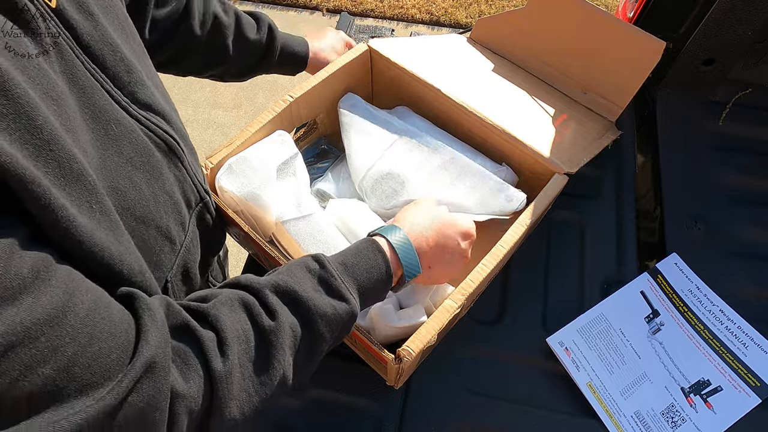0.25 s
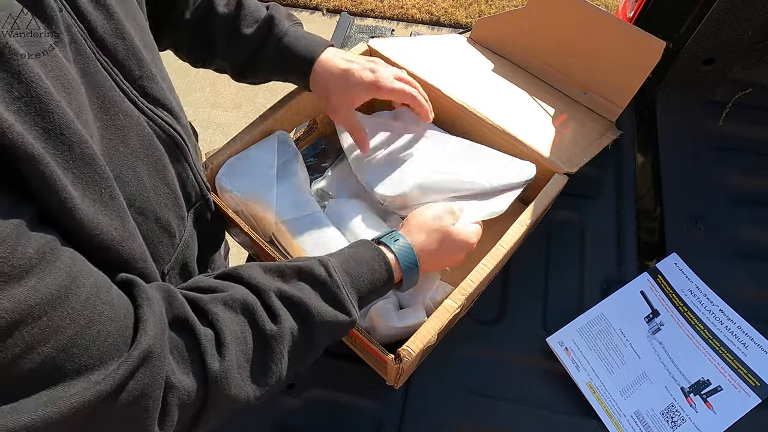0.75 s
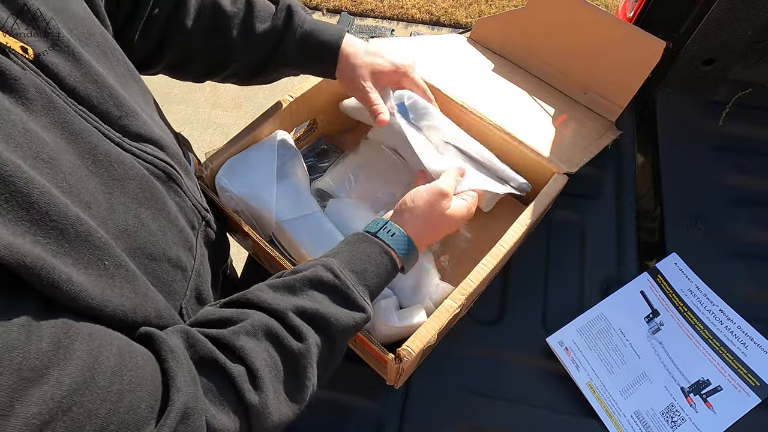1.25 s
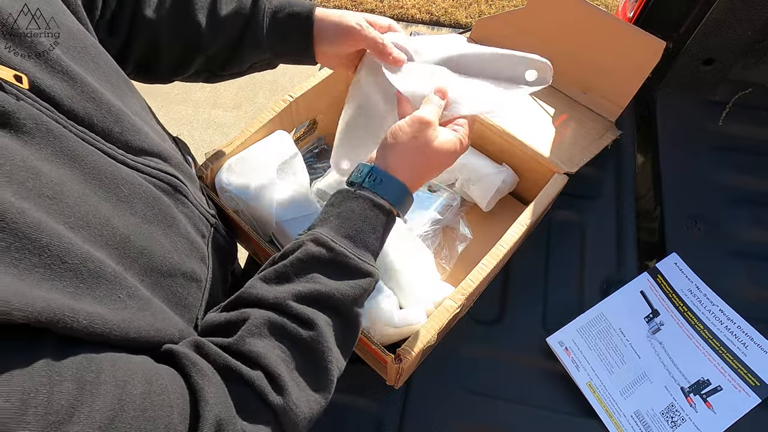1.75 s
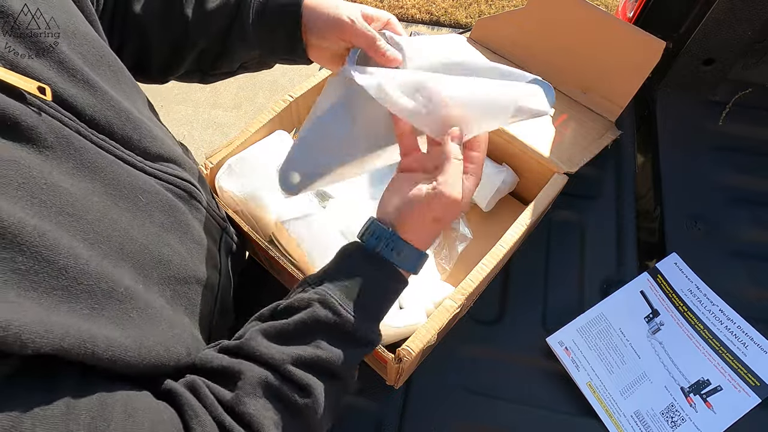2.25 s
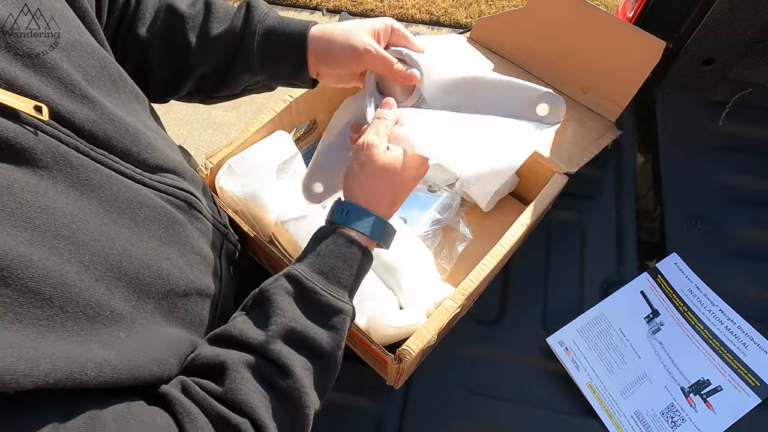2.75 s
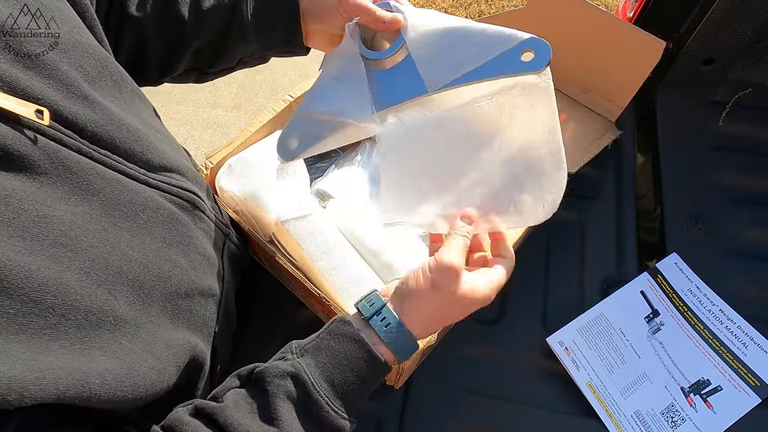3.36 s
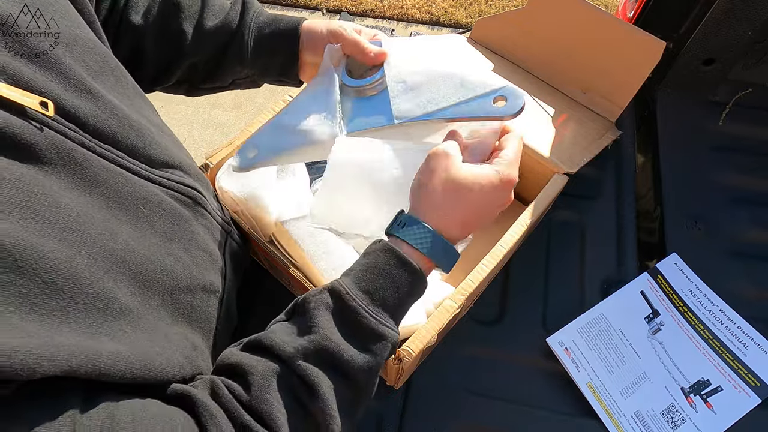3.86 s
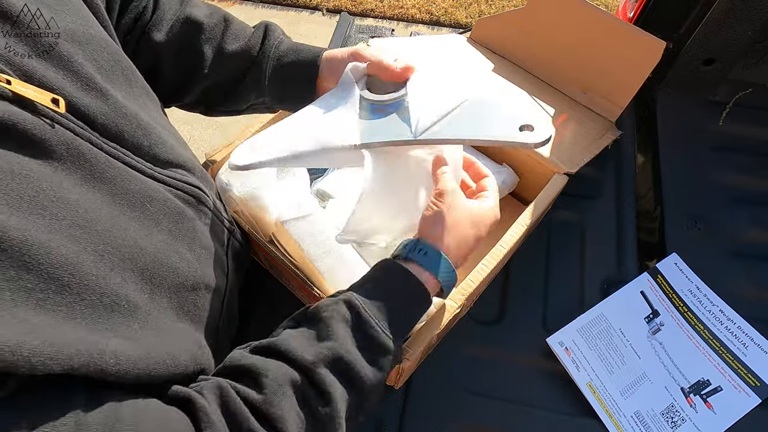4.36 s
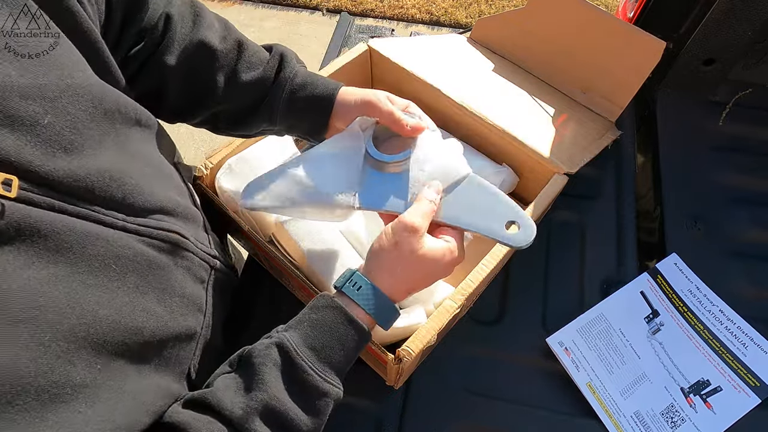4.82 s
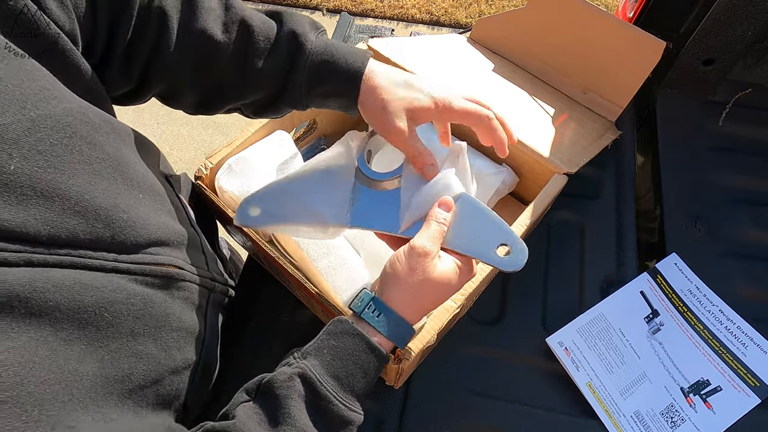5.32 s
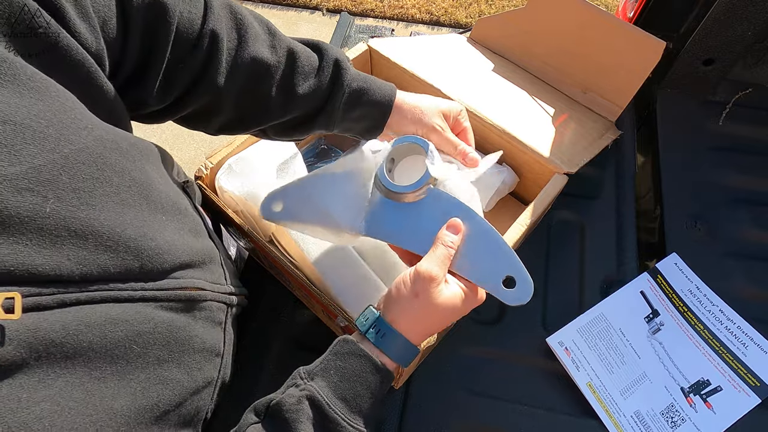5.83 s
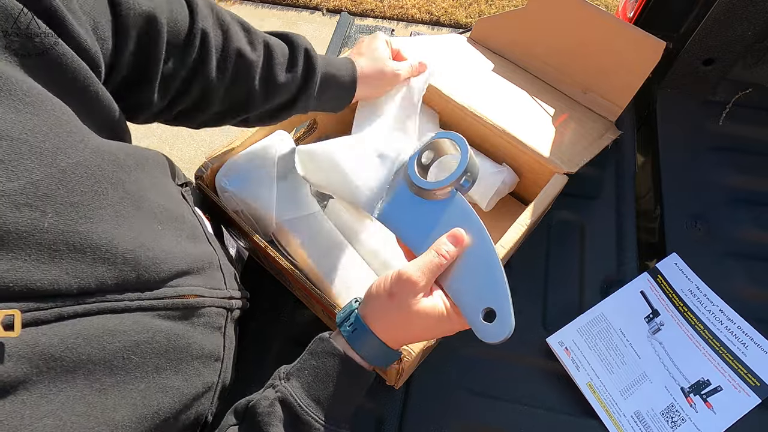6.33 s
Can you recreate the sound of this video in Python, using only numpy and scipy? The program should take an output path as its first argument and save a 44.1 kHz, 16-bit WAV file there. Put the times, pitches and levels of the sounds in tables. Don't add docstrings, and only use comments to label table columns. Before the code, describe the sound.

Outdoors, very close, hands work foam packing wrap off a metal bracket. Sharp dry snaps, small pops and dense rustle come in uneven bursts, with hollow cardboard thuds early on. A short ripping strip of tape sounds near the middle, then the busiest crackling follows around four seconds. Gritty skids and a last hard flurry end it. A light breeze rumbles faintly; the close sound has a slight hollow doubling.

```python
import sys
import numpy as np
from scipy import signal
from scipy.fft import rfft, irfft, next_fast_len
from scipy.io import wavfile
from scipy.ndimage import uniform_filter1d, minimum_filter1d, map_coordinates

SR = 44100
rng = np.random.default_rng(int(sys.argv[2]) if len(sys.argv) > 2 else 0)


def wrap_up_sound(samples):
    columns = np.atleast_2d(samples).T
    tamed = np.clip(columns, -1, 1)
    steps = np.round(tamed * 32767).astype(np.int16)
    wavfile.write(sys.argv[1], SR, steps)


def undo_db(level):
    steps = np.asarray(level, float) / 20
    return 10 ** steps


N = 290442


def unit(x):
    return x / np.sqrt(np.mean(x ** 2) + 1e-20)


def along(points, hz):
    f, v = np.transpose(points)
    return np.interp(np.log(hz + 1), np.log(f + 1), v)


def curves(rows):
    s, *cols = np.transpose(rows)
    return [np.interp(np.arange(N) / SR, s, c) for c in cols]


def wobble(rate):
    knots = rng.standard_normal(int(N * 400 / SR))
    return map_coordinates(knots, [np.arange(N) * rate / SR])


def filtered(x, response):
    m = next_fast_len(N + 8192)
    return irfft(rfft(x, m) * response(np.fft.rfftfreq(m, 1 / SR)), m)[..., :N]


def noise(spectrum):
    return unit(filtered(rng.standard_normal(N), lambda hz: undo_db(along(spectrum, hz))))


def samples(s):
    return (s * SR).astype(int)


def placed(start, shapes):
    at = start[:, None] + np.arange(shapes.shape[1])
    return np.bincount(at.ravel(), shapes.ravel(), N + SR)[:N]


def swells(rows, rest_db):
    slack_db, rounding = 15.5, 1.186
    t = np.arange(N) / SR
    power = undo_db(2 * rest_db) + 0 * t
    for grip, hardest, free, db in rows:
        before = (hardest - t) / max(hardest - grip, .01)
        after = (t - hardest) / max(free - hardest, .01)
        away = np.maximum(before, after)
        power = power + undo_db(2 * (db - slack_db * away ** rounding))
    return 10 * np.log10(power)


def creases(hz, cycles, sag, tick, size):
    turns = hz[:, None] * np.arange(size) / SR
    ring = np.sin(2 * np.pi * (turns + 2 * sag * (1 - np.exp(-turns))))
    ring = ring * np.exp(-turns / cycles) * (1 - np.exp(-turns / 0.1))
    ring[:, 4:16] += tick[:, None] * rng.standard_normal((len(hz), 12))
    return ring


def slips(start, length, gap, db, hz, scatter, spread_db):
    fade_db = 3
    luck = rng.standard_normal((40, 3))
    count = np.arange(len(luck))
    s = start + gap * (count + scatter * luck[:, 0] * (count > 0))
    db = db - fade_db * (s - start) / length + spread_db * luck[:, 1]
    return np.transpose([s, db, hz * np.exp(.065 * luck[:, 2])])[s < start + length]


# start_s, peak_db, ring_hz
TIGHT_TICKS = [(0.8704, -23, 2656), (1.6759, -11, 2700), (0.8844, -17.5, 3320), (2.0218, -9, 2840),
               (3.1797, -14, 2530), (3.4826, -24.5, 2835), (3.5322, -25, 2760), (4.4372, -18, 3500),
               (1.7204, -9, 2200), (4.4454, -14, 3560), (4.7318, -19, 2650), (4.784, -15.5, 2460),
               (4.7991, -13, 2980), (4.9718, -13.5, 3100), (5.0133, -30, 3436), (5.0416, -31, 3630),
               (5.2369, -23, 2720), (5.3783, -13.5, 3160), (6.4494, -13, 3320), (1.161, -19, 2950),
               (1.187, -21, 3130), (1.2418, -21, 2840), (2.9354, -10, 2100), (3.6476, -30.5, 4470),
               (4.0401, -12, 3040), (5.6253, -18.5, 2970), (4.33, -23, 3000), (4.197, -8.5, 2600),
               (3.9875, -12, 3300), (2.5968, -13, 1650), (4.024, -15.5, 2720)]
# start_s, peak_db, ring_hz
FOLD_FLIPS = [(1.115, -11, 2360), (1.8904, -14, 2310), (1.917, -12, 2270), (2.097, -8.5, 1550),
              (2.1609, -11.5, 1500), (3.0526, -15, 2420), (3.3475, -10, 2550), (3.3802, -13.5, 2230),
              (3.538, -15.5, 2320), (3.884, -19, 1480), (3.9084, -13.5, 2170), (4.291, -14, 2120),
              (4.3091, -15.5, 1970), (4.4872, -15.5, 2000), (5.0806, -24, 2131), (5.104, -15.5, 2220),
              (5.657, -14, 2350), (5.8413, -12.5, 1640), (5.9288, -9, 2900), (6.1223, -8.5, 2110),
              (6.1462, -17.5, 2180), (2.073, -12, 1540), (2.124, -20, 1660), (3.288, -31, 2930),
              (5.221, -27, 2220), (4.013, -24, 2200), (6.297, -29, 2010)]
# start_s, peak_db, ring_hz
SETTLING_SNAPS = [(0.0885, -17, 1830), (0.4807, -19, 2650), (0.8434, -13, 3090), (1.143, -18, 1580),
                  (1.826, -14.5, 2630), (1.8723, -19, 1430), (1.897, -11, 2480), (2.0511, -16.5, 1780),
                  (2.143, -12, 1400), (2.215, -20.5, 2025), (2.4161, -26, 2870), (3.1452, -19, 2130),
                  (3.4132, -15.5, 2300), (3.5549, -14, 2900), (4.247, -12, 2620), (4.5424, -20, 2760),
                  (4.7204, -17, 2030), (4.7577, -13.5, 2666), (4.8513, -14.5, 2440), (5.0257, -21, 3740),
                  (5.123, -12.5, 2683), (5.2527, -27, 1970), (5.7987, -12, 2810), (5.909, -19, 2524),
                  (6.257, -17, 2141), (6.3405, -7, 2062), (6.5783, -21, 2330), (5.5651, -24, 2200),
                  (0.826, -29, 2800), (2.77, -29, 2800), (6.283, -25, 1880), (3.7335, -45, 3620),
                  (3.699, -40, 3530)]
# start_s, peak_db, ring_hz
MORE_SETTLING_SNAPS = [(0.3047, -23, 1920), (0.326, -27, 3830), (0.408, -19, 2450), (0.4544, -23, 1640),
                       (0.7971, -29, 1360), (0.922, -31, 2650), (0.9597, -22, 2590), (1.0042, -13, 2646),
                       (1.0914, -21, 2890), (1.275, -35, 1840), (1.3483, -29, 3460), (1.5055, -25, 1060),
                       (1.5514, -26, 1860), (1.8058, -24, 2940), (1.995, -24, 3820), (2.309, -29.5, 3400),
                       (2.376, -27, 2420), (2.5094, -31, 1610), (2.5274, -38, 1624), (2.5563, -31, 2400),
                       (2.6903, -28, 4160), (3.1038, -20, 2610), (3.13, -17, 2900), (3.766, -30, 2350),
                       (3.8958, -18, 1862), (4.0944, -13, 2700), (4.3653, -23, 3600), (4.3951, -32, 2120),
                       (4.4784, -18.5, 1120), (4.5568, -31, 3160), (4.6367, -39, 3220), (4.6593, -30, 2390),
                       (4.6829, -27, 3900), (4.8208, -29, 1640), (5.1536, -34, 2630), (5.1856, -32.5, 1340),
                       (5.6, -24.5, 2360), (5.6455, -22, 2630), (5.7815, -13, 3680), (6.0794, -41, 1860),
                       (6.4918, -19, 2080)]
# start_s, peak_db, ring_hz
CRUSHED_WADS = [(0.028, -31, 1640), (0.2165, -26, 4030), (0.3556, -17.5, 2070), (0.3907, -24, 1720),
                (0.7832, -27, 1460), (0.98, -24, 2584), (1.059, -24, 2180), (1.4495, -18, 1800),
                (1.4633, -20.5, 4010), (1.7745, -24, 1770), (1.82, -16.5, 3144), (2.3434, -20, 1740),
                (2.4089, -24, 2555), (2.5975, -21, 1608), (3.0387, -15.5, 1873), (3.4524, -18, 2190),
                (3.7747, -29, 2251), (3.8228, -22, 1620), (3.8365, -16, 2118), (4.431, -27, 2500),
                (4.568, -20.5, 2343), (4.7048, -21, 2910), (5.4513, -18, 2500), (5.6855, -13, 2440),
                (6.1151, -9.5, 1826), (6.3214, -14.5, 2725), (6.401, -15, 2212), (6.5165, -21.5, 2710)]
# start_s, length_s, gap_s, peak_db, ring_hz
STICK_SLIP_RUNS = [(0.996, 0.033, 0.0079, -12.5, 2590), (3.945, 0.043, 0.013, -11, 2600),
                   (4.1031, 0.026, 0.0082, -15, 2700), (5.9587, 0.045, 0.0097, -13, 1800)]
# start_s, peak_db, ring_hz
SINGLE_SLIPS = [(.2172, -15, 2700), (.2317, -14, 3900), (.2661, -25, 4200), (1.4234, -22, 1500),
                (1.4309, -17, 3000), (1.4643, -11, 4200), (4.0546, -11, 3400), (4.0677, -15, 2200),
                (4.0768, -15, 2300), (4.0873, -18, 2500), (4.2049, -12, 1700), (4.2097, -13, 1700),
                (4.2174, -12, 2900), (4.2268, -11, 2900), (4.279, -13, 2700), (5.706, -12, 3100),
                (5.7159, -15, 3600), (5.7338, -10, 3500), (5.7445, -15, 2900), (5.7475, -14, 3500),
                (5.7545, -11, 3400), (5.7645, -12, 3400), (5.7784, -17, 2800), (5.9466, -14, 1900)]


def snaps():
    runs = np.concatenate([slips(*run, scatter=.03, spread_db=1.5) for run in STICK_SLIP_RUNS])
    clean_db, settle_db, spray_db, run_db = -22, -8.5, 0.5, -17
    kinds = [(TIGHT_TICKS, clean_db), (FOLD_FLIPS, clean_db), (SETTLING_SNAPS, settle_db),
             (MORE_SETTLING_SNAPS, settle_db), (CRUSHED_WADS, spray_db), (runs, run_db), (SINGLE_SLIPS, run_db)]
    s, db, hz = np.concatenate([rows for rows, _ in kinds]).T
    after_db = np.concatenate([np.full(len(rows), after) for rows, after in kinds])
    luck = rng.standard_normal((len(s), 2))
    life = 1.6 * np.exp(.25 * luck[:, :1])
    click = creases(hz, life, sag=.12, tick=.21 * undo_db(2.5 * luck[:, 1]), size=300)
    click += .3 * creases(.62 * hz, 1.8, sag=.3, tick=0 * hz, size=300)
    t = np.arange(1500) / SR
    grit = rng.standard_normal((len(s), 2, len(t)))
    carrier = np.sin(2 * np.pi * hz[:, None] * t)
    tuned = 4.4 * uniform_filter1d(grit[:, 0], size=14, axis=1) * carrier
    bright = grit[:, 1] - uniform_filter1d(grit[:, 1], size=18, axis=1)
    fade = undo_db(after_db[:, None] - 60 * t / 0.034) * (1 - np.exp(-t / 0.0006))
    spray = (tuned + 0.5 * bright) * fade
    start = samples(s)
    return placed(start, undo_db(db + 1.5)[:, None] * click) + placed(start, undo_db(db - 3.0)[:, None] * spray)


# start_s, peak_db
TAPE_SLIPS = [(2.791, -10.5), (2.8018, -11), (2.8076, -11.5), (2.8121, -12.5), (2.8208, -14), (2.8267, -12),
              (2.8331, -14), (2.8409, -13), (2.8523, -12), (2.859, -14), (2.8677, -12), (2.8731, -14),
              (2.8835, -15), (2.8906, -14), (2.8979, -13), (2.9051, -12), (2.914, -14), (2.9465, -14)]


def tear():
    s, db = np.transpose(TAPE_SLIPS)
    hz = (1730 + 700 * np.exp(-(s - s[0]) / .03)) * np.exp(.05 * rng.standard_normal(len(s)))
    pluck = 1.2 * creases(hz, 2.6, sag=.12, tick=np.full(len(s), .4), size=300)
    slip = np.pad(pluck, [(0, 0), (0, 400)])
    t = np.arange(slip.shape[1]) / SR
    grit = rng.standard_normal((2, *slip.shape))
    strip = unit(uniform_filter1d(grit[0], size=56, axis=1)) * np.sin(2 * np.pi * hz[:, None] * t)
    rasp = (.36 * strip + .13 * grit[1]) * undo_db(-60 * t / .045)
    return placed(samples(s), undo_db(db)[:, None] * (slip + rasp))


# start_s, peak_db
TAPE_CRACKS = [(2.0218, -8), (5.7339, -24), (6.1151, -24)]


def cracks():
    s, db = np.transpose(TAPE_CRACKS)
    burst = unit(np.sign(rng.standard_normal((len(s), 40))))
    burst = burst * undo_db(db[:, None] - 1.5 * np.arange(40))
    top_octave = lambda hz: hz ** 4 / (hz ** 4 + 9000 ** 4) / (1 + (hz / 14500) ** 8)
    return filtered(placed(samples(s), burst), top_octave)


# start_s, length_s, rms_db, first_hz, last_hz
EDGE_SKIDS = [(.213, 0.05, -32, 4300, 3930), (.213, 0.028, -30, 2690, 2810),
              (0.406, 0.045, -37, 4290, 4370), (0.568, 0.064, -37, 1099, 1012),
              (1.194, 0.038, -41, 2880, 2980), (1.418, .045, -34, 2625, 1800),
              (1.599, 0.035, -27, 1390, 1803), (1.69, 0.013, -35, 1810, 1850),
              (2.064, .04, -23.5, 1590, 1570), (2.383, .02, -32, 2214, 2200),
              (2.442, 0.058, -43, 1580, 1616), (2.666, 0.017, -38, 1910, 1900),
              (2.721, 0.024, -43, 2860, 2510), (2.941, .014, -28, 2120, 2220),
              (2.969, 0.026, -38, 3500, 3010), (3.011, 0.032, -30, 2420, 2210),
              (3.084, 0.028, -28, 3000, 2790), (3.117, 0.034, -32, 2770, 2370),
              (3.172, 0.033, -29.5, 3100, 2880), (3.314, 0.031, -35.5, 3220, 3040),
              (3.424, 0.026, -32, 2700, 2682), (3.982, 0.023, -26, 2795, 2454),
              (4.086, 0.045, -31, 2646, 2600), (4.128, 0.042, -22, 1338, 1717),
              (4.2, 0.047, -25.5, 1560, 1600), (4.217, .03, -27, 3020, 3060),
              (4.26, 0.0273, -20.5, 1780, 2086), (4.303, 0.016, -27, 2010, 1770),
              (4.434, 0.028, -26.5, 3700, 3780), (4.431, 0.021, -26.5, 1846, 1840),
              (4.511, 0.018, -37, 1820, 1800), (5.312, 0.041, -33.5, 841, 866),
              (5.316, 0.035, -31.5, 1775, 2830), (5.41, 0.03, -30, 2500, 2300),
              (5.8, .03, -23.5, 2800, 1710), (5.886, .018, -27, 1600, 1800),
              (6.317, 0.032, -29, 2790, 2110), (6.39, 0.073, -20.5, 2200, 3320),
              (6.491, .035, -33.5, 2107, 2006)]


def scrapes():
    s, length, db, first_hz, last_hz = np.transpose(EDGE_SKIDS)[..., None]
    t = np.arange(3500) / SR
    u = np.clip(t / length, 0, 1)
    grit = uniform_filter1d(rng.standard_normal(u.shape), size=50, axis=1)
    grit = uniform_filter1d(grit, size=30, axis=1)
    turns = np.cumsum(first_hz + (last_hz - first_hz) * u, axis=1) / SR
    skid = unit(grit) * np.sin(2 * np.pi * turns) * np.abs(np.sin(np.pi * u)) ** .6
    return placed(samples(s[:, 0]), undo_db(db + 0.5) * skid)


def patches(x, depth_db):
    z = signal.stft(x, nperseg=256)[2]
    field = uniform_filter1d(rng.standard_normal(z.shape), size=5, axis=0)
    field = uniform_filter1d(field, size=10, axis=1)
    return signal.istft(z * undo_db(depth_db * unit(field)), nperseg=256)[1][:N]


# time_s, fidget_db, rustle_centre_hz
FIDGETS = [(0, -43.5, 1750), (.25, -44, 2860), (.6, -54.5, 1540), (.92, -41.5, 2800), (1.35, -51, 2720),
           (1.95, -41.5, 2920), (2.09, -42, 1610), (2.27, -52.5, 2430), (2.7, -44.5, 2610),
           (3.67, -65, 2010), (3.93, -44, 1958), (4.35, -42.5, 2680), (4.8, -46, 2290), (5.3, -48, 2150),
           (5.53, -68, 2000), (5.75, -55, 2570), (6.06, -65, 2030), (6.5, -41, 2820)]
# grip_s, hardest_s, let_go_s, rustle_db
SHEET_PULLS = [(.03, .088, 0.075, -29.5), (.214, .222, 0.31, -28), (.25, .39, 0.51, -29.5),
               (.45, .595, 0.69, -37.5), (.88, 1.02, 1.32, -34.5), (1.13, 1.21, 1.265, -33),
               (1.31, 1.373, 1.44, -34.5), (1.41, 1.45, 1.495, -24), (1.5, 1.619, 1.68, -28),
               (1.75, 1.907, 2, -33), (2.04, 2.09, 2.216, -27), (2.33, 2.398, 2.46, -32.5),
               (2.72, 2.87, 3.0, -31), (2.95, 2.99, 3.02, -34), (2.99, 3.035, 3.085, -25),
               (3.02, 3.18, 3.2, -25.5), (3.24, 3.37, 3.555, -35), (3.74, 3.832, 3.9, -44),
               (4.09, 4.155, 4.19, -22), (4.2, 4.235, 4.258, -23), (3.6, 3.66, 3.75, -52),
               (6.0, 6.02, 6.1, -48), (4.258, 4.273, 4.3, -21), (4.36, 4.447, 4.49, -34),
               (4.965, 4.985, 5.1, -40.5), (5.02, 5.131, 5.26, -41.5), (5.3, 5.335, 5.37, -36),
               (5.36, 5.43, 5.5, -35), (5.6, 5.7, 5.82, -30), (5.77, 5.815, 5.87, -25),
               (5.875, 5.905, 5.95, -25), (5.93, 5.99, 6.03, -33), (6.105, 6.127, 6.23, -32),
               (6.265, 6.335, 6.41, -24.5), (6.33, 6.445, 6.465, -21.5), (6.45, 6.5, 5.7, -31.5),
               (4.5, 4.57, 4.45, -35.5), (4.84, 4.855, 4.9, -35.5)]


def rustle():
    fidget_db, centre_hz = curves(FIDGETS)
    db = swells(SHEET_PULLS, fidget_db)
    luck = rng.random((20000, 4))
    start = (luck[:, 0] * N).astype(int)
    hz = centre_hz[start] * np.exp(0.48 * rng.standard_normal(len(start)))
    hz = np.clip(hz, 600, 9000)
    density = np.clip(undo_db(db[start] + 30), .3, 1)
    size = undo_db(np.minimum(-4.5 * np.log(luck[:, 1]), 13)) * np.sign(luck[:, 2] - .5)
    size = size * (luck[:, 3] < density) / np.sqrt(density)
    crackle = creases(hz, 0.89, sag=0.21, tick=np.full(len(hz), .25), size=160)
    grains = placed(start, size[:, None] * crackle)
    hiss = noise([(300, -18.0), (1000, 0.0), (2500, 0.5), (6000, -6.5), (16000, -8.0)])
    clumps = undo_db(.8 * wobble(30) + 1.6 * wobble(90))
    return undo_db(db + 0.5) * unit(clumps * patches(unit(grains) + 0.38 * hiss, depth_db=2.6))


# pitch_hz, level_db, t60_s
STEEL_MODES = [(1570, -3.5, 0.22), (4700, -1, 0.091), (4980, 1, 0.14)]
# start_s, level_db
BRACKET_TAPS = [(2.415, -51), (2.55, -55), (2.596, -46), (3.841, -50), (4.15, -35.5)]


def bracket():
    s, db = np.transpose(BRACKET_TAPS)
    t = np.arange(8000) / SR
    ring = 0
    for hz, level, t60 in STEEL_MODES:
        luck_db = 3.2 * rng.standard_normal((len(s), 1))
        ring = ring + undo_db(level - 60 * t / t60 + luck_db) * np.sin(2 * np.pi * hz * t)
    return placed(samples(s), undo_db(db)[:, None] * ring)


# centre_hz, width_hz, level_db
BOX_MODES = [(168, 73, -4), (250, 82, -2), (365, 110, -4.5), (600, 190, -10.5), (906, 120, -11.5)]
# grip_s, hardest_s, let_go_s, level_db
BOX_DRAGS = [(-.2, .3, 0.45, -39.5), (.39, .425, .5, -25.5), (.51, .594, .69, -27.5),
             (1.1, 1.457, 1.7, -44), (2, 2.107, 2.09, -39), (2.81, 2.943, 1.8, -46), (3, 3.145, 3.2, -38.5),
             (3.3, 3.448, 3, -57), (3.75, 3.8, 4.04, -42), (3.85, 4.066, 4.2, -37),
             (5.445, 5.458, 5.475, -38), (5.3, 5.9, 6.3, -47), (6.29, 6.436, 6.46, -34)]
# start_s, peak_db, panel_hz
BOX_BUMPS = [(0.411, -17, 250), (0.44, -19, 237), (0.535, -11, 250), (0.57, -13.5, 260), (0.592, -13, 250),
             (0.644, -22, 259), (1.447, -27.5, 296), (1.822, -20.5, 583), (2.064, -23, 874),
             (2.097, -18.5, 321), (2.124, -30, 280), (2.147, -21, 259), (2.162, -24, 285),
             (2.348, -33.5, 278), (3.44, -32, 198), (3.834, -27, 304), (3.055, -28.5, 292),
             (3.136, -32, 302), (4.056, -21.5, 493), (4.206, -26.5, 258.5), (5.455, -22, 240),
             (5.879, -22.5, 549), (5.931, -14, 1000), (5.95, -24, 330), (6.432, -26.5, 230),
             (0.53, -24, 135), (0.782, -30, 330), (1.34, -33, 250), (1.69, -35, 262), (4.488, -26, 600),
             (5.188, -37.5, 298), (6.515, -26, 420), (2.415, -35, 514)]


def box_ring(f):
    total = 0
    for k, (centre, width, db) in enumerate(BOX_MODES):
        damping = 1j * f * width
        total = total + (-1) ** k * undo_db(db) * damping / (centre * centre - f * f + damping)
    return total


def box():
    resting_db = -57.5
    drag = undo_db(2 * wobble(40)) * rng.standard_normal(N)
    rub = unit(filtered(drag, lambda f: box_ring(f) / (1 + (f / 9000) ** 4)))
    rub = rub * undo_db(swells(BOX_DRAGS, resting_db) - 1.0)
    s, db, hz = np.transpose(BOX_BUMPS)[..., None]
    t = np.arange(4000) / SR
    overtone = 0.38 * np.sin(2 * np.pi * 2.175 * hz * t) * undo_db(-60 * t / 0.068)
    panel = np.sin(2 * np.pi * hz * t) + overtone
    knock = unit(uniform_filter1d(rng.standard_normal(panel.shape), size=24, axis=1))
    panel += .6 * knock * undo_db(-60 * t / .03)
    cycles = np.interp(db, [-20, -12], [18, 34])
    thud = undo_db(db - 2 - 60 * t * hz / cycles) * panel * (1 - np.exp(-t / 0.00085))
    soft = lambda f: (1j * f / (140 + 1j * f)) ** 4 / (1 + 1j * f / 1500) ** 4
    return rub + filtered(placed(samples(s[:, 0]) - 100, thud), soft)


# time_s, level_db
WIND_LEVEL = [(0.0, -56.5), (0.59, -52.5), (0.96, -61), (1.46, -56), (1.75, -68), (2.05, -61), (2.36, -81),
              (2.53, -82), (2.9, -62), (3.35, -63.5), (3.76, -51), (4.39, -83), (4.67, -62.5),
              (5.08, -68.5), (5.99, -59.5), (6.24, -74), (6.37, -65), (6.59, -69)]
# pitch_hz, density_db
WIND_RUMBLE = [(15, -38), (28, 2), (70, 13), (130, 8.5), (250, -20), (900, -120)]


def breeze():
    shared = undo_db(2.0 * wobble(2.97)) * noise(WIND_RUMBLE)
    apart = .11 * noise(WIND_RUMBLE) * [[1], [-1]]
    return undo_db(curves(WIND_LEVEL)[0]) * (unit(shared) + apart)


# heard_from_s, nearest_s, gone_s, level_db
VEHICLE_PASS = [(3.35, 3.55, 3.88, -49)]
# pitch_hz, density_db
ROAD_DRONE = [(50, -60), (110, 1), (200, 0), (320, -4.5), (430, -35), (800, -120)]


def traffic():
    return undo_db(swells(VEHICLE_PASS, -83)) * noise(ROAD_DRONE)


# pitch_hz, density_db
YARD_HISS = [(25, -34), (130, 4), (270, -15), (800, 3), (2600, -7), (7000, -23), (13000, -10), (15500, -24)]


def outdoors():
    return undo_db(-61 + 1.5 * wobble(5)) * noise(YARD_HISS)


# pitch_hz, level_db
MICROPHONE_TONE = [(60, -69), (300, 0), (800, -3.5), (2000, -3), (4500, 0), (7000, -4), (9000, -14),
                   (11600, -0.5), (12600, -8.5), (13200, -20.5), (14900, -21), (15300, -40), (16500, -42)]
# pitch_hz, level_db
CAMERA_WIDTH = [(100, -34), (300, -23), (2000, -30), (6000, -18), (9000, -11), (12000, -10), (15000, 2)]


def scene():
    camera_lag_s = 166.3 / 44100
    foam = rustle() + outdoors() + tear() + snaps() + scrapes() + bracket()
    sound = filtered(foam, lambda hz: undo_db(along(MICROPHONE_TONE, hz))) + box() + traffic()
    top = cracks()
    close = filtered(sound, lambda hz: 1 / (1 + (hz / 8100) ** 24)) + 0.49 * top
    camera = 0.66 * filtered(sound + top, lambda hz: np.exp(-2j * np.pi * hz * camera_lag_s))
    sway = unit(wobble(300))
    side = filtered(camera * sway, lambda hz: undo_db(along(CAMERA_WIDTH, hz)))
    side = side - filtered(camera, lambda hz: 0.2 * np.exp(-((hz - 12100) / 900) ** 2))
    return close + camera + side * [[1], [-1]] + breeze()


def low_pass(x):
    return signal.sosfilt(signal.butter(12, 17960, fs=SR, output="sos"), x)


def record(dry):
    needed = np.minimum(1, .3 / (np.abs(dry).max(axis=0) + 1e-9))
    gain = uniform_filter1d(minimum_filter1d(needed, size=260), size=130)
    mix = filtered(dry * gain, lambda hz: hz < 17900)
    return low_pass(mix)


dry = scene()
out = record(dry)
wrap_up_sound(out)
```